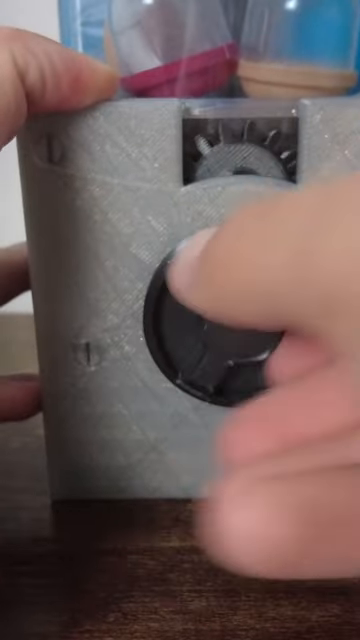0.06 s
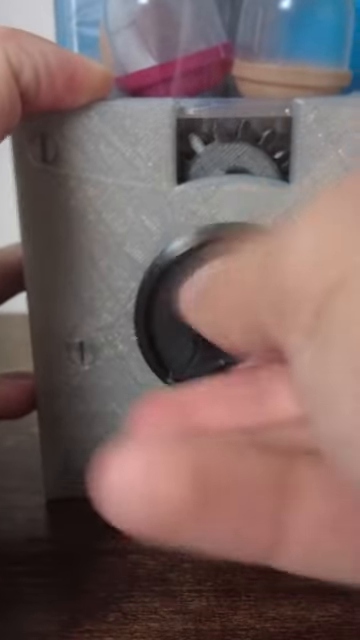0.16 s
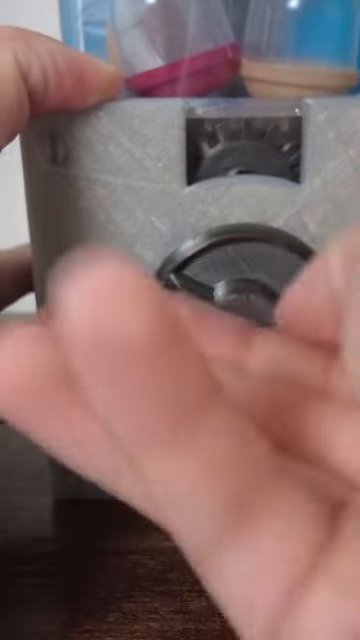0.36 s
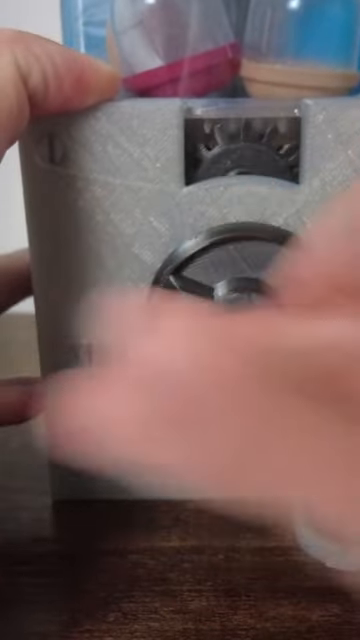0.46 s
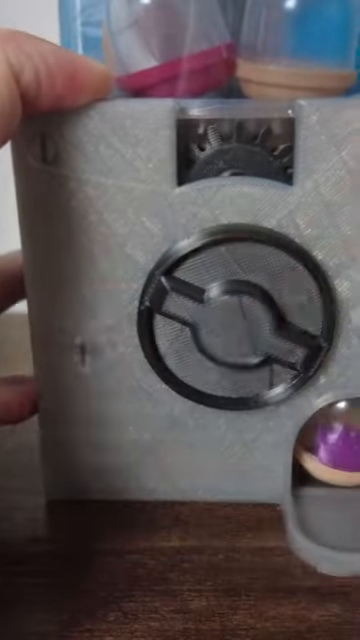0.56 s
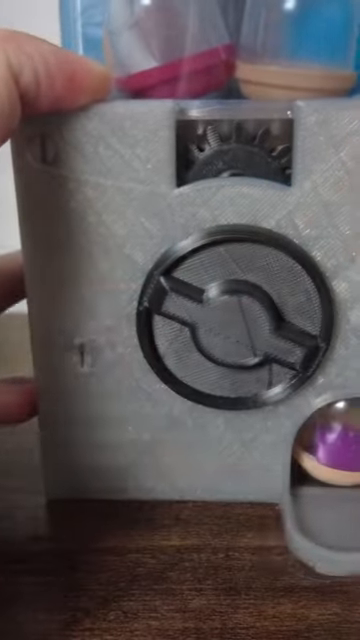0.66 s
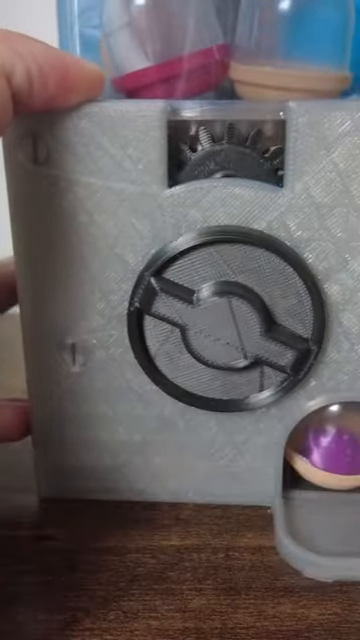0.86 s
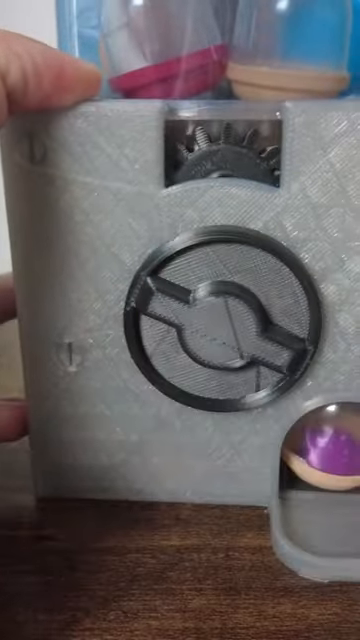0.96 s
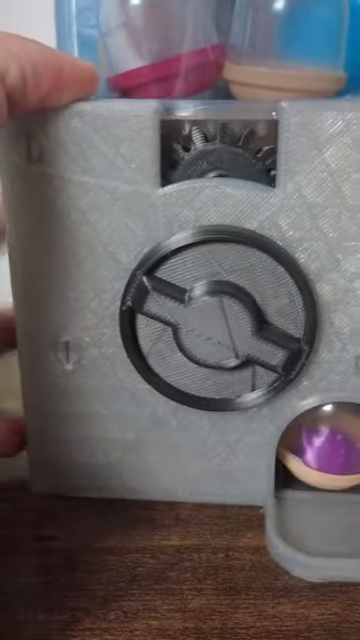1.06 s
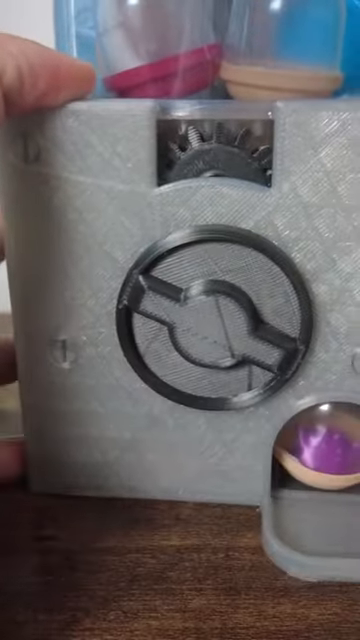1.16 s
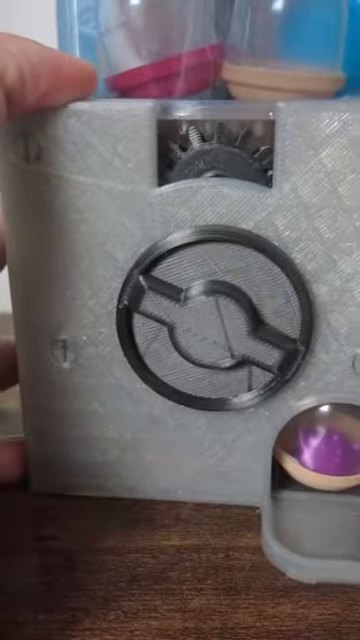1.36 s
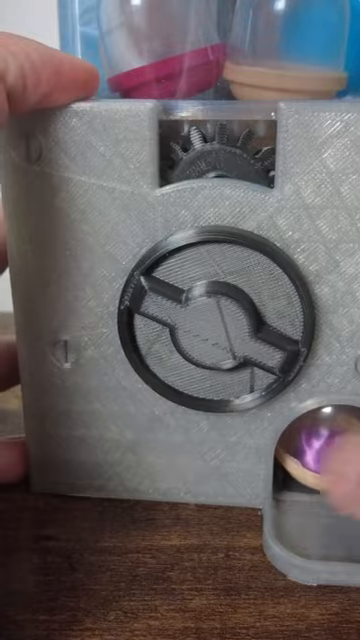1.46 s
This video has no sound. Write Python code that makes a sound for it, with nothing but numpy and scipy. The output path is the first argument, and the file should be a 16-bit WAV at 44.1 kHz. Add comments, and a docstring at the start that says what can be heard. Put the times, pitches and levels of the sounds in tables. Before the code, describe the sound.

Plastic capsule dispenser cranked close up: clicks, a sharp clack, then a brief rattle.

```python
"""At a table in a small room, a hand turns the knob of a little plastic capsule dispenser, close up.
The pawl clicks, gear teeth tick and scrape, and the box rocks with low thuds. One hard clack rings
the housing as a capsule is released; it rattles down, lands in the tray and later shifts with a tick.
Each hit is a noise crack plus the damped modes of a plastic part; scrapes and rattle are tiny clicks.
The room answers briefly over a low, steady rumble."""
import sys
import numpy as np
from scipy import signal
from scipy.fft import rfft, irfft
from scipy.io import wavfile

SR = 44100
rng = np.random.default_rng(int(sys.argv[2]) if len(sys.argv) > 2 else 0)


def unload_wav(signal):
    """Save mono or channel-first audio to the path in sys.argv[1] as 16-bit WAV at rate SR, clipped to [-1, 1]."""
    wavfile.write(
        sys.argv[1],
        SR,
        np.round(np.clip(np.atleast_2d(signal).T, -1, 1) * 32767).astype(np.int16),
    )


N = 66150
T = np.arange(N) / SR
HZ = np.maximum(np.fft.rfftfreq(N, 1 / SR), 1)
CONTACT_SIDE_DB, DIFFUSE_SIDE_DB = -6.5, -3.5  # stereo width: side against mid


def amp(db):
    """Decibels to gain."""
    return 10 ** (np.asarray(db) / 20)


def unit(x):
    """Scale to rms 1."""
    return x / np.sqrt(np.mean(x ** 2))


def fade(t, t60):
    """Exponential decay from t = 0, losing 60 dB every t60 seconds."""
    return np.exp(-np.log(1000) * np.maximum(t, 0) / t60)


def curve(points):
    """EQ curve: the gain at every frequency from (Hz, dB) points."""
    hz, db = np.array(points, float).T
    return amp(np.interp(np.log(HZ), np.log(hz), db))


def colour(x, points):
    """Minimum-phase EQ through (Hz, dB) points, so nothing rings ahead of an attack."""
    cepstrum = irfft(np.log(curve(points)), N)
    cepstrum[1:N // 2] *= 2
    cepstrum[N // 2 + 1:] = 0
    impulse = irfft(np.exp(rfft(cepstrum)), N)[None, :N // 16]
    return signal.fftconvolve(x, impulse, axes=-1)[:, :N]


def noise(gain, width):
    """Stereo noise of rms 1, with a gain and a width per frequency."""
    mid, side = rfft(rng.standard_normal((2, N))) * gain
    return unit(irfft(np.array([mid + width * side, mid - width * side]), N))


def grains(per_s=2500, spread_db=2):
    """Dense tiny clicks of uneven size."""
    clicks = (rng.random(N) < per_s / SR) * rng.choice([-1, 1], N)
    return (clicks * amp(spread_db * rng.standard_normal(N)))[None]


def die_away(x, t60_s, at_hz, damping, hold_s=0):
    """Fade each octave at its own rate, the treble soonest; t60_s holds at at_hz."""
    out = 0
    for hz in 1000 * 2. ** np.arange(-4, 5):
        band = np.maximum(1 - abs(np.log2(HZ / hz)), 0)
        out = out + irfft(rfft(x) * band, N) * fade(T - hold_s, t60_s * (at_hz / hz) ** damping)
    return out


def at(x, start):
    """Delay a sound to its cue."""
    return np.pad(x, ((0, 0), (max(int(start * SR), 0), 0)))[:, :N]


def gate(start, length, edge_s=.004):
    """Envelope with a short ramp in, a hold and an exponential release."""
    attack = np.clip((T - start) / edge_s + .5, 0, 1)
    return attack * np.exp(-np.maximum(T - start - length, 0) / edge_s)


def ring(modes, attack_s=.0005):
    """Damped modes of a struck plastic part; a positive pan leans left."""
    out = sum(amp([[db + pan / 2], [db - pan / 2]]) * np.sin(2 * np.pi * hz * T) * fade(T, t60)
              for hz, db, t60, pan in modes)
    return out * (1 - np.exp(-T / attack_s))


def crack():
    """Hard plastic contact: a bright noise burst stands for dense, quickly damped high modes."""
    # spectrum of the contact: freq_hz, gain_db
    spectrum = [(200, -26.5), (900, -15.5), (1800, -6.5), (2600, 1.5), (4300, -5.5), (6500, -2),
                (8400, -11), (9800, -3.5), (11200, -10.5), (13800, -6.5), (16000, -11.5)]
    burst = noise(curve(spectrum), amp(CONTACT_SIDE_DB))
    return amp(-16.5) * die_away(burst, t60_s=.026, at_hz=4900, damping=.29, hold_s=.0012)


def strikes(modes, blows, crack_db):
    """Each blow cracks and rings one plastic part, with its own level and brightness."""
    # bass, mid, presence and treble points of the EQ: freq_hz
    bands = (300, 1000, 2800, 12000)
    body, out = ring(modes), 0
    for start, db, bass, presence, treble in blows:
        tone = list(zip(bands, (bass, 0, presence, treble)))
        hit = colour(body + amp(crack_db) * crack(), tone)
        out = out + amp(db) * at(hit, start)
    return out


def background():
    """Room tone: low rumble with a few droning resonances and faint hiss."""
    # spectrum of rumble and hiss: freq_hz, gain_db
    spectrum = [(10, -27.5), (22, -3.5), (42, 1.5), (90, -7.5), (125, -8), (200, -15), (310, -13),
                (420, -20.5), (520, -19.5), (660, -24.5), (800, -29), (1070, -38), (1400, -34), (3000, -44),
                (7000, -55.5), (16000, -64)]
    # stereo width of the room tone: freq_hz, side_db
    spread = [(60, -16.5), (110, -18), (200, -12.5), (380, -11.5), (700, 0), (1290, -2), (2380, -6.5),
              (4400, 3), (8120, -1.5), (15000, 1.5)]
    # low resonances: pitch_hz, bandwidth_hz, level_db
    resonances = [(128.5, 12, -56.5), (239.4, 30, -59.5), (297, 18, -61.5), (589.5, 48, -61),
                  (629.4, 21, -59.5)]
    width = curve(spread)
    drones = sum(amp(db) * noise(1 / (1 + ((HZ - hz) / bandwidth * 2) ** 2), width)
                 for hz, bandwidth, db in resonances)
    return amp(-43) * noise(curve(spectrum), width) + drones


def room(x):
    """Quick reflections from table and box, then the tail of a small room."""
    # colour of the reverb: freq_hz, gain_db
    spectrum = [(100, -2), (300, 0.5), (600, -3), (1200, -4.5), (2500, -3.5), (5000, -3.5), (9000, -11.5),
                (15000, -11)]
    tone, width = curve(spectrum), amp(DIFFUSE_SIDE_DB)
    tail = die_away(noise(tone, width), t60_s=.44, at_hz=1000, damping=.2)
    early = noise(tone, width) * fade(T, t60=.05825)
    reflections = amp(-15) * unit(tail) + amp(-19.5) * unit(early)
    response = at(reflections, start=.006) / np.sqrt(N)
    return signal.fftconvolve(x, response, axes=-1)[:, :N]


def rocking():
    """The box rocks on the table; each thud is one low, damped sine."""
    # thuds on the table: start_s, pitch_hz, level_db, t60_s
    thuds = [(0.214, 165, -36, 0.083), (0.371, 110, -26, 0.19), (0.41, 290.6, -32, 0.13),
             (0.43, 69.2, -28, 0.2), (0.577, 47.4, -33, 0.21)]
    return sum(at(amp(db) * (np.sin(2 * np.pi * hz * T) * fade(T, t60))[None], start)
               for start, hz, db, t60 in thuds)


def fingers():
    """Skin skids briefly off the knob; the holding hand brushes the box."""
    # bright friction on the knob: freq_hz, gain_db
    skid_tone = [(1000, -16), (4000, -2), (6500, -5.5), (8000, -5.5), (10500, -1), (12500, -12),
                 (14000, -1), (16000, -15)]
    # fingertips on the box: start_s, length_s, level_db
    touches = [(0, .05, -65), (0.569, 0.0094, -56), (0.741, 0.026, -68), (.868, 0.019, -60.5),
               (0.929, .03, -64), (1.052, .02, -66)]
    # soft friction on the box: freq_hz, gain_db
    touch_tone = [(300, -12), (900, 0), (1500, 5.5), (3200, -5.5), (6000, -17.5), (15000, -22)]
    skid = amp(-50.5) * gate(start=.544, length=.017) * unit(colour(grains(), skid_tone))
    pressure = sum(amp(db) * gate(start, length) for start, length, db in touches)
    return skid + pressure * noise(curve(touch_tone), amp(DIFFUSE_SIDE_DB))


def scrapes(squeak_db=4, squeak_width_oct=.12, pan_db=2):
    """Ridged plastic sticks and slips; each stroke favours one resonance."""
    # teeth rubbing: start_s, length_s, level_db, treble_db, resonance_hz
    strokes = [(0.113, 0.053, -56, 0.5, 800), (0.182, 0.042, -48, -10, 1000),
               (0.289, 0.015, -40, -8.5, 1330), (0.318, 0.014, -44.5, -0.5, 1050),
               (0.343, 0.034, -34, -2.5, 1150), (0.404, 0.028, -35.5, -3, 1000),
               (0.51, 0.041, -47.5, -2.5, 1250)]
    # spectrum of the friction: freq_hz, gain_db
    spectrum = [(150, -10.5), (550, -3), (1000, -1), (1450, -4), (2100, -15), (4500, -18), (8000, -24),
                (15000, -29)]
    ratio, out = 2 ** squeak_width_oct, 0
    for start, length, db, treble, hz in strokes:
        squeak = [(hz / ratio, 0), (hz, squeak_db), (hz * ratio, 0), (6000, treble)]
        friction = colour(grains(), spectrum)
        out = out + amp(db) * unit(colour(friction, squeak)) * gate(start, length)
    return out * amp([[pan_db / 2], [-pan_db / 2]])


def pawl():
    """The pawl snaps in with one dry click as the turn begins."""
    # modes of the pawl: pitch_hz, level_db, t60_s, pan_db
    modes = [(590, -22.5, 0.053, -3.5), (949, -5, 0.0076, 2.5), (1170, -15, 0.01, -1.5),
             (1720, -14, .014, 0), (3850, -11, 0.0053, -11.5), (8100, -5.5, 0.0042, 3)]
    # the click: start_s, level_db, bass_db, presence_db, treble_db
    clicks = [(0.0607, -11, -4.5, -12.5, -12.5)]
    return strikes(modes, clicks, crack_db=-2.5)


def gears():
    """Teeth catch unevenly, each one ringing the gear wheels."""
    # modes of the wheels: pitch_hz, level_db, t60_s, pan_db
    modes = [(274, -28.5, 0.14, 3), (378, -23.5, .05, -3.5), (540, -19.5, 0.031, -2), (947, -18, .02, 3),
             (1270, -17, 0.031, -1), (1504, -15.5, .03, -1.5), (1641, -19, .025, -4.5),
             (2466, -16, .016, 0), (4130, -20.5, .01, -0.5), (9350, -17, 0.011, -2)]
    # teeth catching: start_s, level_db, bass_db, presence_db, treble_db
    catches = [(0.1095, -21.5, 9.5, -13.5, -20.5), (0.1928, -29.5, -2.5, -18, -23),
               (0.2038, -26.5, -8, 2.5, -15.5), (0.2155, -19.5, -2.5, -9, -12),
               (0.2223, -18, -3.5, -5.5, -5.5), (0.2256, -13, 6.5, -6.5, -12),
               (0.3119, -15.5, 3, -13.5, -23.5), (0.3193, -30.5, -7, -11.5, -17),
               (0.3445, -24, -3, -15, -17.5), (0.3523, -17.5, -14.5, -3, -11)]
    return strikes(modes, catches, crack_db=-1.5)


def capsule_ticks():
    """The capsule shifts in the tray and its shell ticks lightly."""
    # modes of the shell: pitch_hz, level_db, t60_s, pan_db
    modes = [(524, 4.5, .02, 0.5), (1226, 2, 0.019, -7), (1650, 3, 0.027, -1), (2850, -2, 0.019, -4),
             (4140, 1.5, 0.02, 2.5), (4570, 3, 0.014, -6.5), (5800, -7, 0.016, 6.5),
             (7820, -7.5, 0.0089, -8)]
    # light contacts: start_s, ring_db, crack_db
    ticks = [(1.4437, -66, -44.5), (1.4830, -40.5, -37)]
    shell = ring(modes)
    return sum(at(amp(db) * shell + amp(crack_db) * crack(), start) for start, db, crack_db in ticks)


def chute_rattle():
    """The capsule chatters down the chute in a fading spray of tiny impacts."""
    # spectrum of the chatter: freq_hz, gain_db
    spectrum = [(150, -12.5), (500, 3), (1400, 4), (2000, -10), (3000, -7), (4800, -13.5), (7500, -17.5),
                (8600, -17), (10000, -22.5), (15500, -26)]
    chatter = grains() + amp(CONTACT_SIDE_DB) * grains() * np.array([[1], [-1]])
    return at(amp(-30.5) * unit(colour(chatter, spectrum)) * fade(T, t60=.27), start=.381)


def tray_landing():
    """The capsule drops into the tray and rings it with a dull knock."""
    # modes of the tray: pitch_hz, level_db, t60_s, pan_db
    modes = [(392.6, -38, 0.033, -6), (540, -16, 0.024, -4), (608, -17.5, 0.036, 2), (938, -23.5, 0.099, 4),
             (1280, -17.5, 0.029, 0), (1337, -14, 0.046, -2), (1605, -21, 0.048, 0),
             (3010, -18.5, 0.031, -2)]
    # the landing: start_s, level_db, bass_db, presence_db, treble_db
    landings = [(.5322, -13.5, 2.5, -10, -20)]
    return strikes(modes, landings, crack_db=-6.5)


def release_clack():
    """One hard, bright blow rings the whole housing as the capsule is released."""
    # modes of the housing: pitch_hz, level_db, t60_s, pan_db
    modes = [(300, -31, .05, 0), (503, -14, .045, 0), (586, -21, .06, 0), (710, -20, .05, 0),
             (972, -22, .06, 0), (1028, -14, .042, 0), (1329, -16, .042, 0), (1760, -15.5, .03, -1),
             (2290, -16, .026, -3), (2368, -23, .04, 0), (2770, -19, .024, 0), (3040, -14.5, .028, -2),
             (4650, -20, .014, -3), (5750, -22, .008, 0), (6450, -19, .007, 4), (7580, -20, .01, 5),
             (10100, -24, .01, 4)]
    # the blow: start_s, level_db, bass_db, presence_db, treble_db
    knocks = [(0.3705, -1.5, 1, 2, 3.5)]
    return strikes(modes, knocks, crack_db=2)


def scene(left_lag_s=.00002):
    """The dispenser stands slightly to the right in a quiet room, so the left ear hears it later."""
    turning = pawl() + gears() + scrapes() + fingers()
    dropping = release_clack() + chute_rattle() + tray_landing() + capsule_ticks()
    box = turning + dropping
    lag = np.exp(-2j * np.pi * np.fft.rfftfreq(2 * N, 1 / SR) * left_lag_s)
    left = irfft(rfft(box[0], 2 * N) * lag)[:N]
    return np.array([left, box[1]]) + room(box) + rocking() + background()


def record(dry, top_hz=15900):
    """A steep low-pass trims the very top of the mix."""
    return signal.sosfilt(signal.ellip(8, .2, 70, top_hz, fs=SR, output="sos"), dry)


dry = scene()
out = record(dry)
unload_wav(out)
```